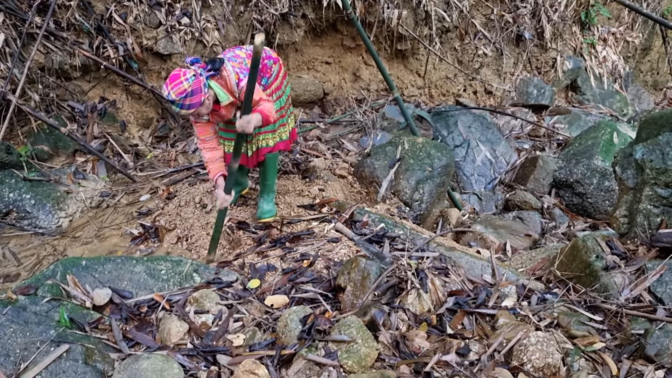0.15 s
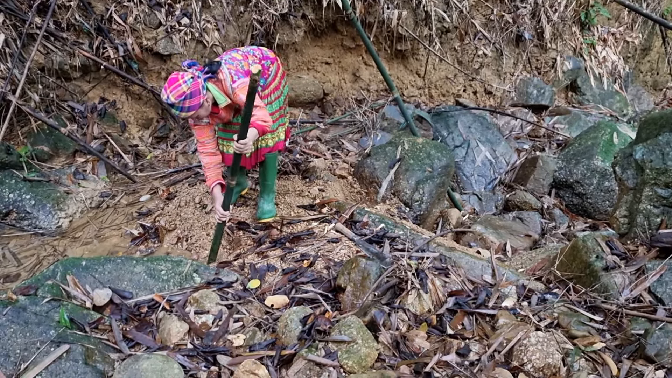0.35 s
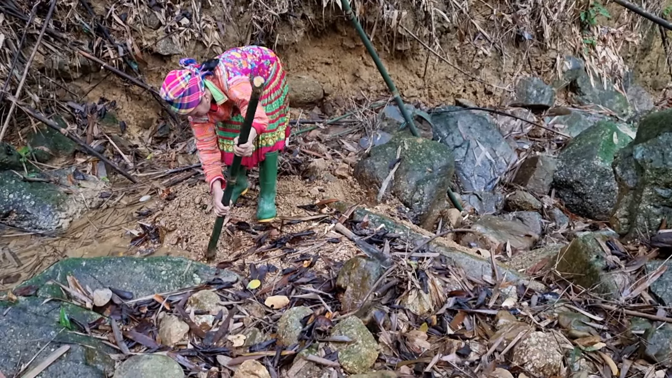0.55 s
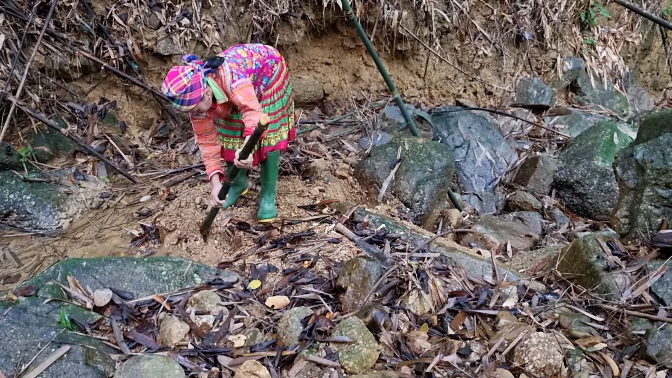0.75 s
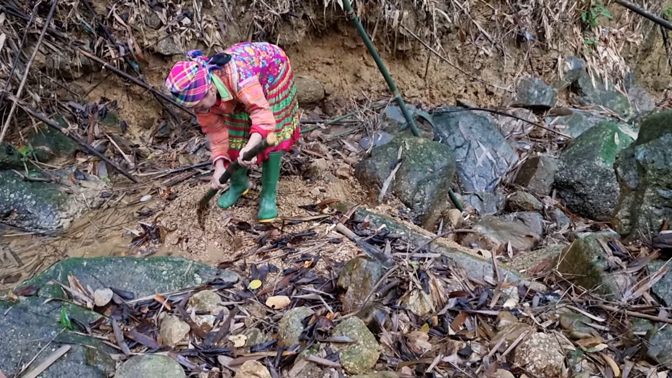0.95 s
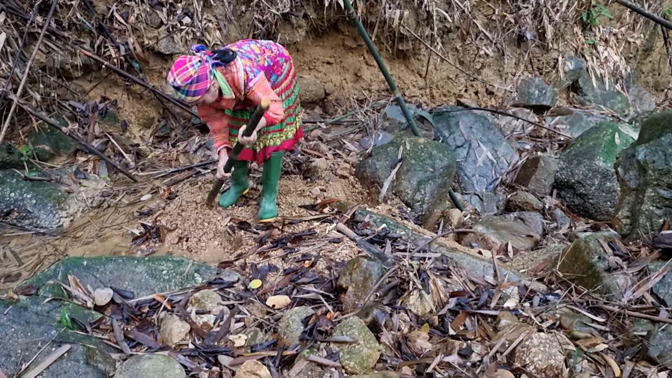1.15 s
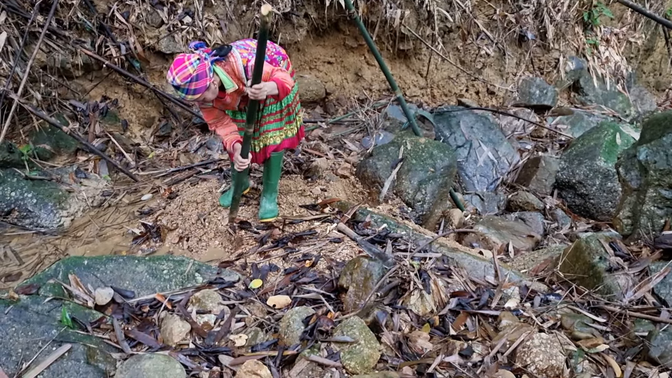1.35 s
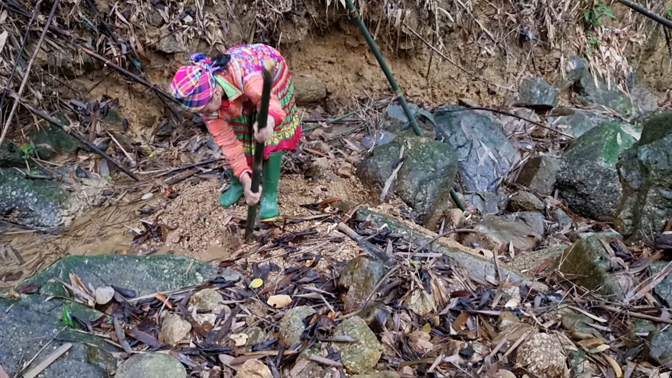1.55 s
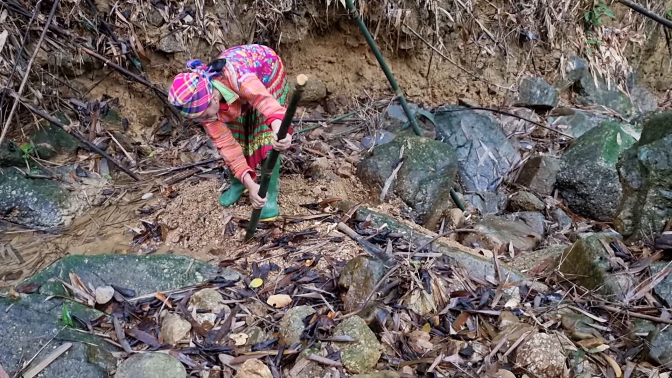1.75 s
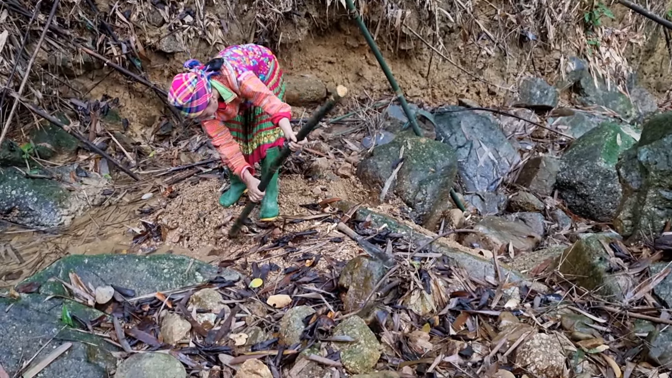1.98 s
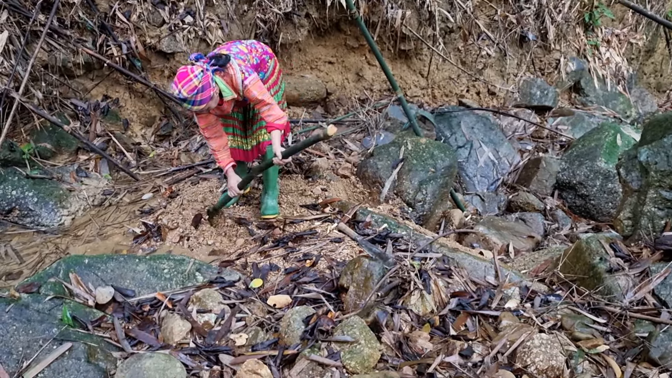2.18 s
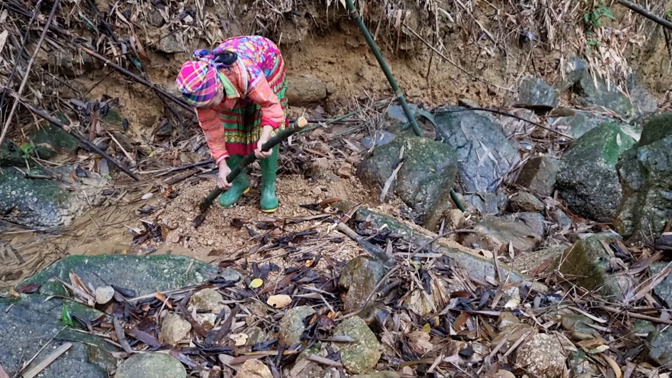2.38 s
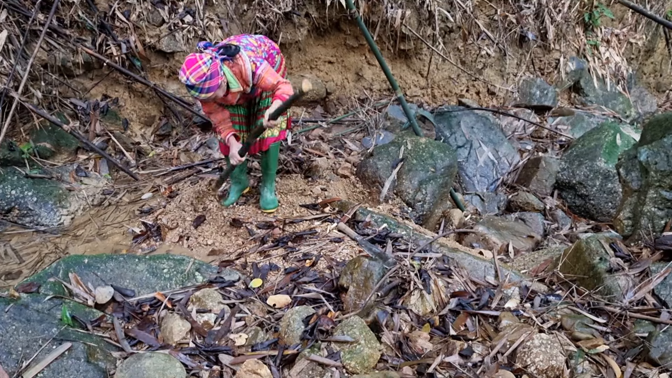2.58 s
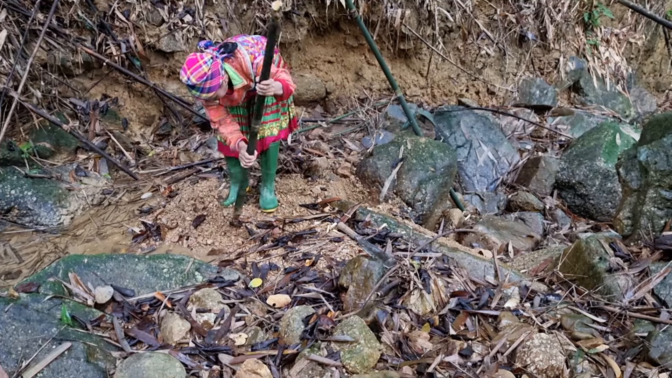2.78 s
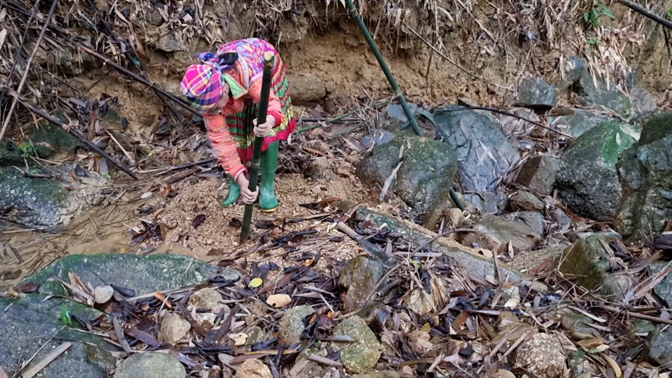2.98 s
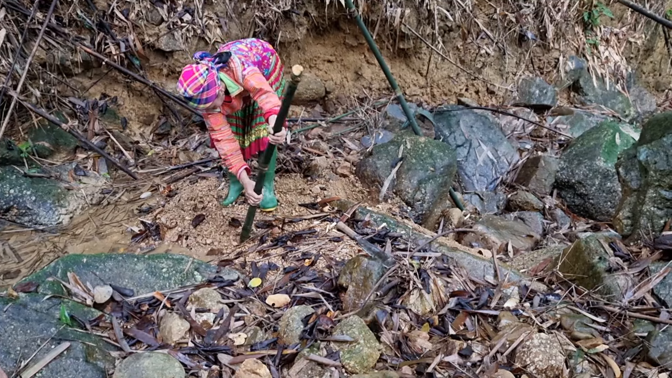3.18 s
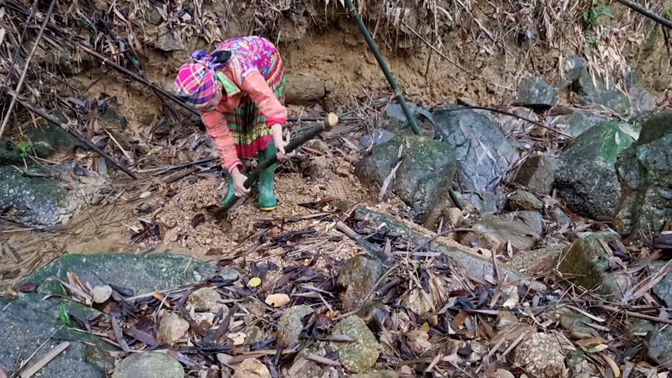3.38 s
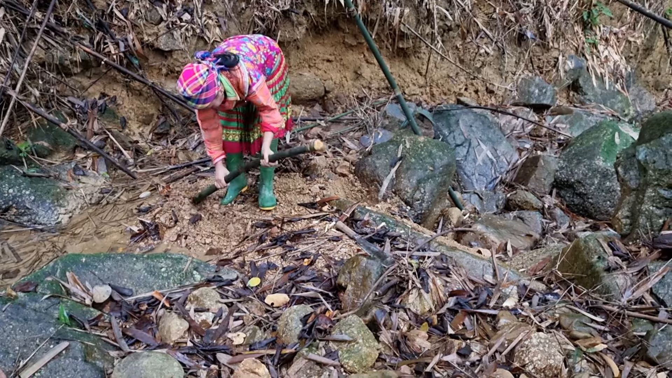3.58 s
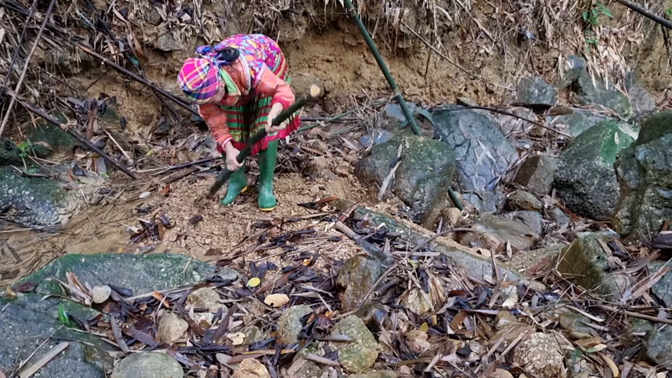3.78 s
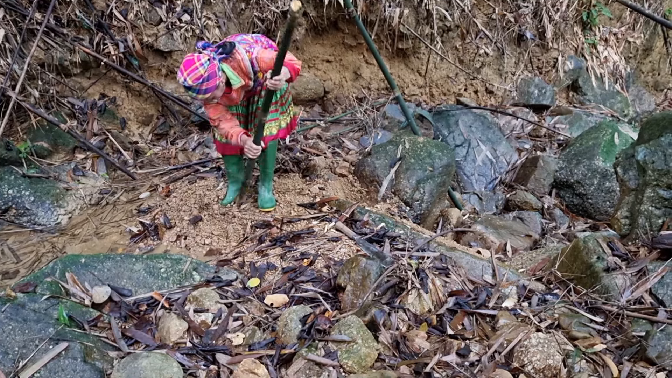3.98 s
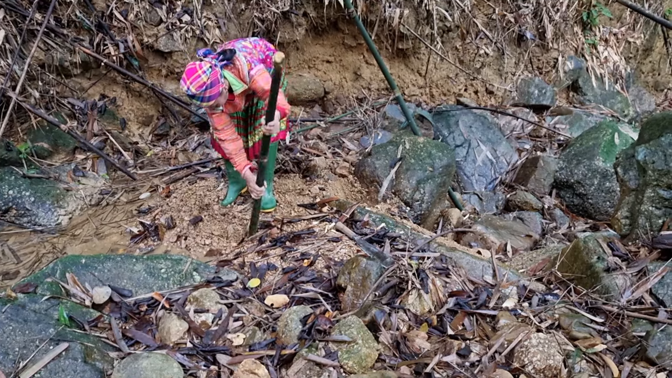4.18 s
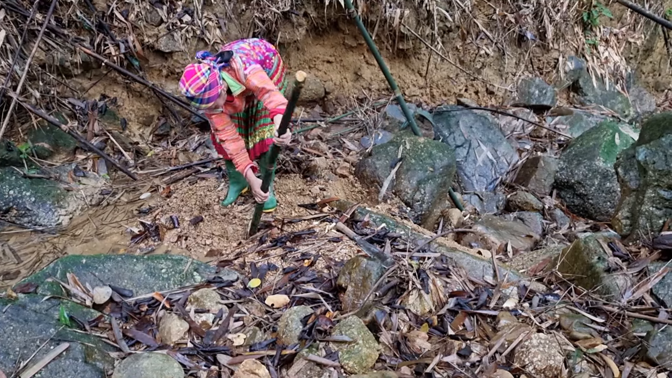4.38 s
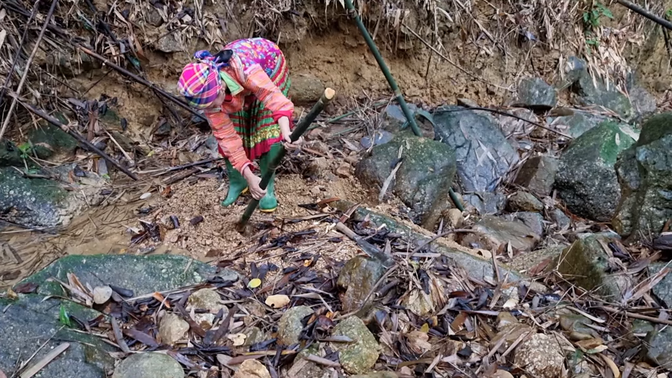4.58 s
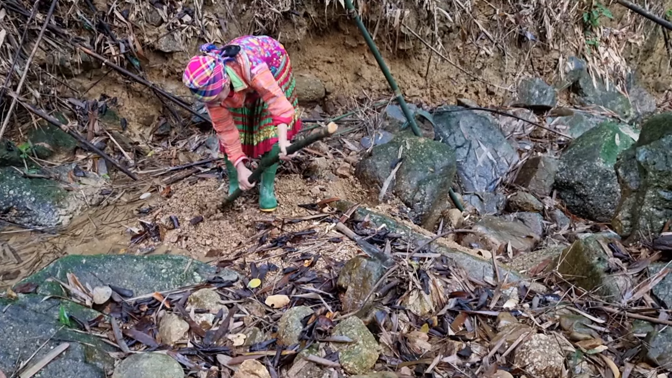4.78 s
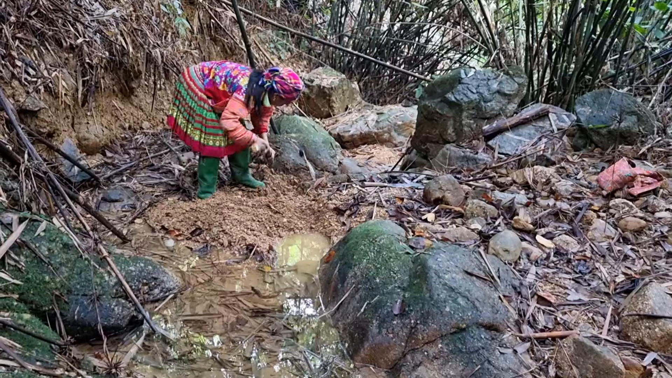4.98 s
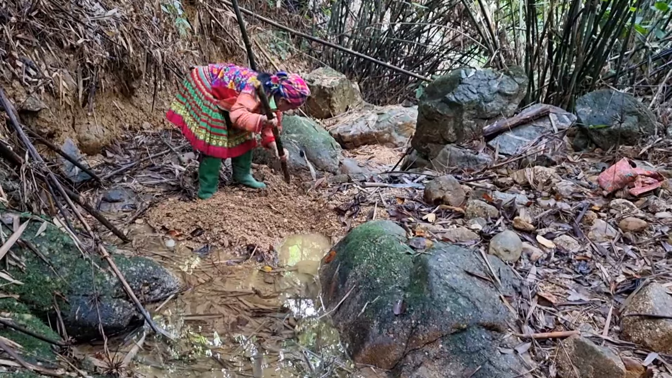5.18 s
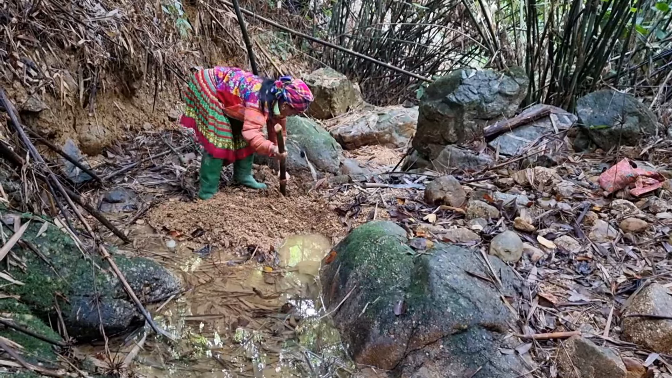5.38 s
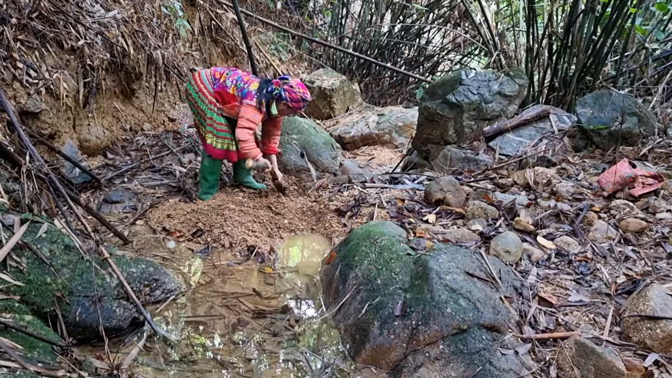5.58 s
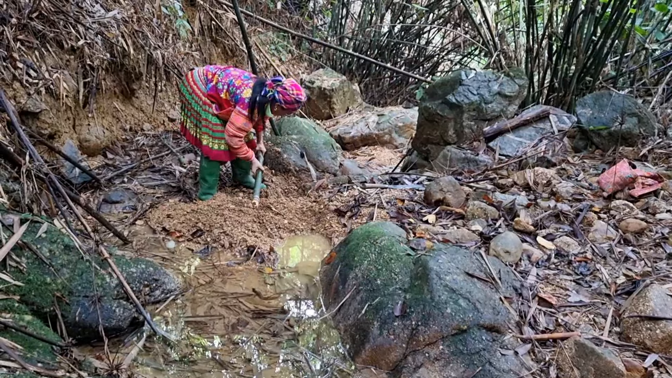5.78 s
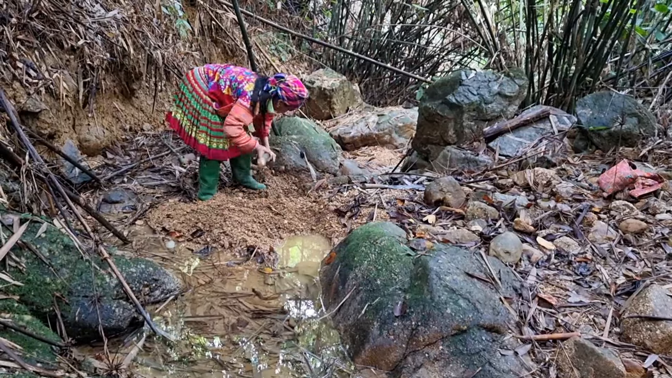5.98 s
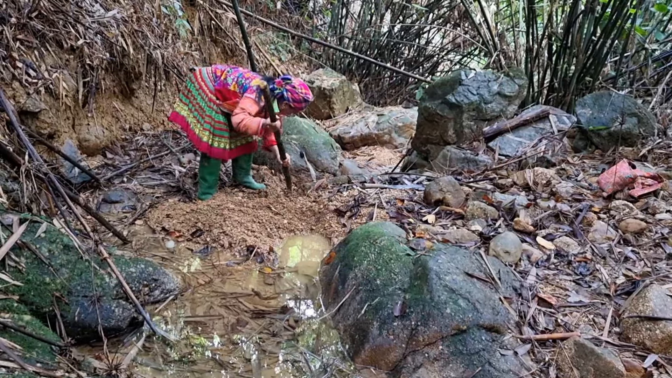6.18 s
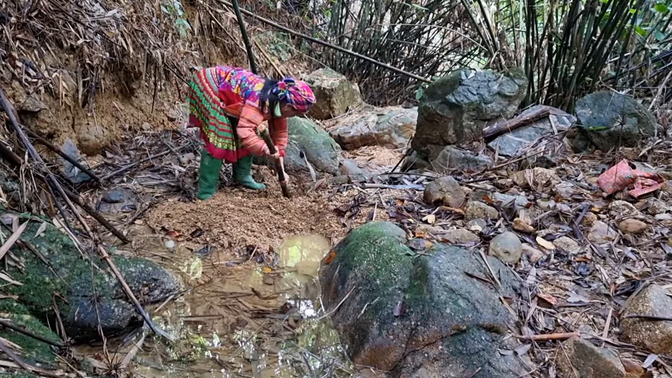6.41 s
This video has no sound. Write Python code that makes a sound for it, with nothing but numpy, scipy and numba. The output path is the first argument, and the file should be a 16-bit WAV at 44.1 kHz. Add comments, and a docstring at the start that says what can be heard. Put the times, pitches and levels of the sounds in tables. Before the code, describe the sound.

A small stream trickles with a soft, steady hiss outdoors while a digging pole works wet gravelly soil. The pole stabs in at about 0.2, 1.6, 3.0 and 4.2 seconds, each time with a short gritty crunch and a dull thud from the ground. After each strike it levers and scrapes through the gravel, around 0.5 to 1, 1.8 to 2.4, 3.2 to 3.6 and 4.4 to 4.9 seconds. Small stones click against the blade, clods knock softly and wet crumbs patter down, with a slight short echo off the rocks. At about 4.9 seconds everything drops to a momentary silence, then returns with the water closer, louder and splashier. Two quick stabs land at 5.4 and 5.6 seconds, followed by a scatter of wet crumbs around 5.9. A last strike at about 6.35 seconds comes with a scrape and sharp stone clicks.

```python
"""On the rocky bank of a small stream, a steel-shod digging pole is stabbed into wet gravelly soil
and levered to break it loose. Grit crunches as a mass of tiny impacts, the ground thuds, the blade
scrapes by stick-slip friction, stones ring and crumbs patter down, all scattered by the rocks.
The water hisses, splashes and rings with bubbles. After a short silence the work is heard from a
second place, closer to the stream."""
import sys
import numpy as np
from scipy import signal
from scipy.fft import rfft, irfft, next_fast_len
from scipy.io import wavfile
from scipy.ndimage import uniform_filter1d, map_coordinates
from numba import njit

SR = 44100
rng = np.random.default_rng(int(sys.argv[2]) if len(sys.argv) > 2 else 0)


def unload_audio(sound):
    """Save the sound as a 16-bit wav file, at the path given as the first command line argument."""
    columns = np.transpose(np.atleast_2d(sound))
    # keep every value between -1 and 1, then stretch to whole-number steps
    steps = np.round(np.clip(columns, -1, 1) * 32767)
    wavfile.write(sys.argv[1], SR, steps.astype(np.int16))


N = 284445
TIME = np.arange(N) / SR
FFT_SIZE = next_fast_len(N + SR // 2, True)
SILENCE_START_S, SILENCE_END_S = 4.89, 5.02


def from_db(db):
    """Amplitude ratio of a level in decibels."""
    return 10 ** (np.asarray(db) / 20)


def unit_power(x):
    """Normalisation to a mean square of one."""
    return x / np.sqrt(np.mean(x ** 2) + 1e-20)


def drift(turns_per_s):
    """Slow random modulation of unit power."""
    knots = rng.standard_normal(4000)
    return unit_power(np.interp(TIME * turns_per_s, np.arange(len(knots)), knots))


def frequency_response(spectrum):
    """Gain in each FFT bin, interpolated in decibels over log frequency."""
    hz, db = np.transpose(spectrum)
    bin_hz = np.fft.rfftfreq(FFT_SIZE, 1 / SR)
    return from_db(np.interp(np.log(bin_hz + 1), np.log(hz), db))


def coloured(x, spectrum):
    """Minimum-phase filter with the given spectral shape; white noise keeps its power."""
    cepstrum = irfft(np.log(unit_power(frequency_response(spectrum))), FFT_SIZE)
    cepstrum[1:FFT_SIZE // 2] *= 2
    cepstrum[FFT_SIZE // 2 + 1:] = 0
    return irfft(rfft(x, FFT_SIZE) * np.exp(rfft(cepstrum)), FFT_SIZE)[..., :N]


def grains(per_s, spread_db):
    """Shot noise: tiny contacts of random time, sign and size, at unit power."""
    sizes = from_db(spread_db * np.minimum(rng.exponential(1, N), 4.5))
    return unit_power(sizes * rng.choice([-1, 1], N) * (rng.random(N) < per_s / SR))


def bursts(per_s, spread_db, decay_s):
    """Envelope of random impacts whose energy decays exponentially."""
    energy = grains(per_s, spread_db) ** 2 + 1e-18
    return np.sqrt(signal.lfilter([1], [1, -np.exp(-1 / (decay_s * SR))], energy))


def contact(start, length, rise, t60):
    """Envelope of one contact: linear rise, hold and exponential decay, all in seconds."""
    age = TIME - start
    return np.clip(age / rise, 0, 1) * from_db(-60 * np.clip((age - length) / t60, 0, 3))


def resonator(x, hz, radius, numerator):
    """A damped oscillator driven by x; its amplitude shrinks by the factor `radius` each sample."""
    feedback = [1, -2 * radius * np.cos(2 * np.pi * hz / SR), radius * radius]
    return signal.lfilter(numerator, feedback, x + 1e-18)


def trickle(spectrum, bubbles_per_s, bubble_db, splash_db, flutter_db, ring_cycles=24):
    """Bubble resonance: trapped air rings briefly amid hiss and puffs of spray, in stereo."""
    bubbles = np.zeros((2, N))
    pitches = np.geomspace(900, 10000, num=22)
    for hz in pitches:
        radius = from_db(-60 * hz / (ring_cycles * SR))
        per_s = bubbles_per_s * np.sqrt(hz / 3000) / len(pitches)
        pops = grains(per_s, spread_db=2.2) * rng.uniform(-1, 1, (2, N))
        bubbles += np.sqrt(hz) * unit_power(resonator(pops, hz, radius, [0, 1]))
    splashes = bursts(per_s=90, spread_db=2, decay_s=0.005) * rng.standard_normal((2, N))
    hiss = rng.standard_normal((2, N))
    water = hiss + from_db(bubble_db) * unit_power(bubbles) + from_db(splash_db) * unit_power(splashes)
    # long waves reach both sides alike
    water += signal.sosfilt(signal.butter(1, 450, fs=SR, output="sos"), water.mean(axis=0) - water)
    return unit_power(coloured(water, spectrum)) * from_db(flutter_db * drift(45))


# Spectra of the water from afar and close by: frequency_hz, relative_db
FAR_WATER_SPECTRUM = [(20, -37.5), (65, -13.5), (150, -20.5), (420, -16.5), (555, -5.5), (700, -9),
                      (1100, -12), (1600, -2.5), (2000, 0.5), (2800, -3.5), (4200, -4), (6000, -6),
                      (7900, -3.5), (9000, -10), (15500, -10)]
NEAR_WATER_SPECTRUM = [(20, -44), (65, -19), (200, -14.5), (300, -12.5), (500, -8), (700, -2.5), (1100, -1),
                       (1800, 2.5), (2600, 1.5), (4200, 0.5), (7900, 0), (9500, -5.5), (15500, -3.5)]


def stream(far_db=-44.0, near_db=-35.5):
    """A steady source is louder at short range: the water is first some way off, then close by."""
    far = trickle(FAR_WATER_SPECTRUM, bubbles_per_s=700, bubble_db=-9, splash_db=-9.5, flutter_db=1.5)
    near = trickle(NEAR_WATER_SPECTRUM, bubbles_per_s=500, bubble_db=-7, splash_db=1.5, flutter_db=0.77)
    return np.where(TIME < SILENCE_END_S, from_db(far_db) * far, from_db(near_db) * near)


# Spectra of a wet crumb's bright smack and dull body: frequency_hz, relative_db
SMACK_SPECTRUM = [(1000, -37), (2500, 0.5), (4500, 5.5), (6200, 0.5), (7900, 0), (9200, -10),
                  (15500, -13.5)]
BODY_SPECTRUM = [(300, -19), (900, -16.5), (1900, 0.5), (3100, 2.5), (4600, -4.5), (8000, -33)]


def small_crumbs(per_s=70, far_db=-57, near_db=-47, body_db=-6):
    """Inelastic impacts: wet crumbs drop at random, each a brief burst of noise."""
    smacks = bursts(per_s, spread_db=1.2, decay_s=0.004) * rng.standard_normal(N)
    patter = from_db(np.where(TIME < SILENCE_END_S, far_db, near_db)) * unit_power(smacks)
    return coloured(patter, SMACK_SPECTRUM) + coloured(from_db(body_db) * patter, BODY_SPECTRUM)


# Spectra of crushed gravel, sharp grit and sand: frequency_hz, relative_db
GRAVEL_SPECTRUM = [(200, -15.5), (450, -20.5), (720, -0.5), (950, -7), (1300, -3), (1600, 1), (2100, 3),
                   (2800, 3), (4500, -12.5), (9000, -30.5)]
GRIT_SPECTRUM = [(800, -14.5), (1700, -4), (2600, -3), (3500, 0), (4800, -1), (6200, -9), (7900, -9.5),
                 (9000, -13), (15500, -17.5)]
SAND_SPECTRUM = [(1200, -16), (2500, 3), (4200, -1.5), (6200, -3), (8000, -2), (9000, -9), (15500, -12)]
# Blows that bite, stick and bite again, with relative levels: start_s, length_s, gravel_db, grit_db,
# second_delay_s, second_gravel_db, second_grit_db, bounce_db, bounce_hz, shake_db
BLOWS = [(0.217, 0.014, -39.5, -29, 0.022, -31.5, -28, -46.5, 134.7, -47.5),
         (1.568, 0.03, -23, -24, 0.035, -27.5, -34.5, -42.5, 118, -42.5),
         (2.95, 0.01, -22, -23.5, 0.019, -26.5, -24.5, -38, 124, -37.5),
         (4.213, 0.018, -23, -22.5, 0.025, -31.5, -31.5, -45.5, 109, -49.5),
         (5.372, 0.012, -25, -28.5, 0.029, -27.5, -28, -44.5, 124, -40),
         (5.647, 0.0076, -30.5, -32.5, 0.013, -29, -43, -55, 189.8, -47.5),
         (6.352, 0.022, -26, -37, 0.035, -27.5, -29.5, -44, 173.4, -52)]


def stabs(rise_s=0.0064, gravel_gain_db=-5.0, grit_gain_db=-2.4, spray_gain_db=-13):
    """Granular crushing: the blade bites twice and sprays sand; incoherent bites add in power."""
    bites = [row[:4] for row in BLOWS]
    for start, length, _, _, delay, gravel_db, grit_db, *_ in BLOWS:
        bites.append((start + delay, length, gravel_db, grit_db))
    gravel, grit, spray = np.zeros((3, N))
    for start, length, gravel_db, grit_db in bites:
        gravel += (from_db(gravel_db + gravel_gain_db) * contact(start, length, rise_s, t60=0.13)) ** 2
        grit += (from_db(grit_db + grit_gain_db) * contact(start, length, rise_s, t60=0.16)) ** 2
        settling = contact(start - length / 2, length, rise=length, t60=0.28)
        spray += (from_db(grit_db + spray_gain_db) * settling) ** 2
    crunch = pole(coloured(np.sqrt(gravel) * grains(per_s=5000, spread_db=4), GRAVEL_SPECTRUM))
    crunch += coloured(np.sqrt(grit) * grains(per_s=5900, spread_db=-3), GRIT_SPECTRUM)
    return crunch + coloured(np.sqrt(spray) * grains(per_s=5000, spread_db=3), SAND_SPECTRUM)


# Modes of the pole and its blade: pitch_hz, bandwidth_hz, gain_db
POLE_MODES = [(748, 156, -7), (1310, 130, 7), (1550, 160, -1.5), (1940, 430, -7), (3280, 400, -20),
              (4740, 240, -22)]


def pole(x):
    """Modal resonance: contacts are heard directly and through the damped modes of the pole."""
    out = x.copy()
    for hz, bandwidth_hz, db in POLE_MODES:
        radius = np.exp(-np.pi * bandwidth_hz / SR)
        band_pass = (1 - radius * radius) / 2 * np.array([1, 0, -1])
        out += from_db(db) * resonator(x, hz, radius, band_pass)
    return out


# Spectrum of the shaking ground: frequency_hz, relative_db
GROUND_SPECTRUM = [(20, -32), (38, -19), (56, -3), (90, -12.5), (122, -9), (160, -16), (210, -3.5),
                   (290, -17), (450, -17), (900, -33.5)]
# Clods breaking loose or dropping: start_s, length_s, knock_db, pitch_hz, shake_db
CLOD_KNOCKS = [(0.613, 0.012, -50, 480, -64), (2.27, 0.028, -57, 208, -57), (2.318, 0.015, -41.5, 410, -54),
               (2.773, 0.055, -65, 230, -58), (3.375, .022, -62.5, 139, -54),
               (3.554, 0.023, -58, 204.6, -54), (6.368, 0.046, -41, 338, -60)]


def thuds(lag_s=0.012, overhang_s=0.0073, pitch_wobble=0.0929):
    """Damped vibration: soft ground bounces at a low note and shakes under each blow or clod."""
    shake = coloured(grains(per_s=2000, spread_db=3), GROUND_SPECTRUM)
    shake /= np.sqrt(uniform_filter1d(shake ** 2, size=1500) + 1e-9)  # even out its level
    phase_per_hz = 2 * np.pi * np.cumsum(1 + pitch_wobble * drift(60)) / SR
    out = np.zeros(N)
    for bite_start, length, _, _, delay, _, _, bounce_db, hz, shake_db in BLOWS:
        # the ground is driven from just after the first bite until just after the second
        start = bite_start + lag_s
        hold = delay + length + overhang_s - lag_s
        bounce = np.sin(hz * phase_per_hz)
        out += from_db(bounce_db) * contact(start, hold, rise=0.0099, t60=0.14) * bounce
        out += from_db(shake_db) * contact(start, hold, rise=0.022, t60=0.19) * shake
    for start, length, knock_db, hz, shake_db in CLOD_KNOCKS:
        knock = from_db(knock_db) * np.sin(hz * phase_per_hz) + from_db(shake_db) * shake
        out += contact(start, length, rise=0.006, t60=0.12) * knock
    return out


@njit
def moving_resonance(x, hz, damping):
    """State-variable band-pass whose centre follows hz; damping is 1/Q."""
    out, low, band = np.zeros(len(x)), 0., 0.
    for i in range(len(x)):
        step = 2 * np.sin(np.pi * hz[i] / SR)
        low += step * band
        band += step * (x[i] - low - damping * band)
        out[i] = band / np.sqrt(step)
    return out


# Spectra of the scraping blade and the rumbling soil: frequency_hz, relative_db
SCRAPE_SPECTRUM = [(200, -22), (430, -11), (650, 4), (950, 0.5), (1300, -4), (2150, 3), (2600, -4),
                   (5000, 4.5), (10000, -27)]
RUMBLE_SPECTRUM = [(20, -20), (55, -5), (120, -1), (220, 1), (400, -1), (600, 3.5), (1200, -41.5)]
# Levering pushes, with relative levels: start_s, rise_s, length_s, scrape_db, sag_db_per_s, sand_db,
# rumble_db, give_delay_s, centre_before_hz, centre_after_hz, hole_ring_db
PUSHES = [(0.455, 0.032, 0.029, -38.5, -9, -46.5, -69, .05, 1700, 1610, 1),
          (0.58, 0.048, .29, -36, 39.5, -44.5, -59, 0.12, 1540, 820, 0),
          (0.905, .04, 0.036, -45.5, 6, -52.5, -72, .04, 780, 960, -6),
          (1.807, 0.017, 0.022, -38, 16, -61, -63.5, .04, 1560, 1560, -0.5),
          (1.885, 0.026, 0.053, -43.5, 4, -47, -62.5, .04, 1580, 1550, -20),
          (1.93, .147, .4, -33.5, 30.5, -42, -50, 0.41, 1560, 480, -20),
          (3.23, 0.11, 0.31, -34.5, 12.5, -42, -52, 0.4, 1430, 1220, -13.5),
          (4.44, 0.053, 0.092, -41, 17.5, -49.5, -75, .08, 1230, 1120, -7.5),
          (4.54, 0.034, 0.12, -41.5, 22, -50.5, -67, 0.073, 1200, 1330, -9),
          (4.68, 0.082, 0.26, -41.5, 3, -52, -56.5, 0.24, 1340, 1004, -12),
          (6.305, 0.03, 0.13, -35.5, 11, -39, -60, 0.096, 1680, 1500, -19)]


def levering(slip_depth_db=2.4, slips_per_s=70, release_t60=0.32, give_s=0.13, crack_s=0.013):
    """Stick-slip friction: the blade drags through gravel; yielding soil rumbles and bends the pitch."""
    scrape, hollow, sand, rumble = np.zeros((4, N))
    centre_hz = np.full(N, float(PUSHES[0][8]))
    for start, rise, length, db, sag, sand_db, rumble_db, delay, before_hz, after_hz, hole_db in PUSHES:
        age = TIME - start
        effort = contact(start, length, rise, release_t60) * (age < length + release_t60)
        sag_db = -sag * np.clip(age - rise, 0, length)
        crack_db = np.exp(-((age - rise) / crack_s) ** 2)  # packed gravel cracks at full force
        level = effort * from_db(db + sag_db + crack_db) / np.hypot(1, from_db(hole_db))
        scrape += level
        hollow += level * from_db(hole_db)
        settling = from_db(-7) * contact(start, length, rise=length, t60=1.6)  # loose sand trickles on
        sand += np.hypot(effort, settling) * from_db(sand_db + 0.89 * sag_db + crack_db / 2)
        giving = (age - delay) / give_s  # passes zero as the soil gives way
        rumble += effort * from_db(rumble_db + 0.14 * sag_db + 5 * np.exp(-giving ** 2))
        glide_hz = before_hz + (after_hz - before_hz) * (1 + np.tanh(giving)) / 2
        centre_hz = np.where(TIME < start, centre_hz, glide_hz)
    slip_db = slip_depth_db * drift(slips_per_s)
    friction = pole(coloured(grains(per_s=1800, spread_db=1.5), SCRAPE_SPECTRUM))
    rasp = unit_power(moving_resonance(friction, centre_hz, damping=0.97))
    hole_ring = moving_resonance(grains(per_s=1500, spread_db=2), centre_hz, damping=0.36)
    hole_ring = unit_power(moving_resonance(hole_ring, centre_hz, damping=0.36))
    scraping = from_db(slip_db) * (scrape * rasp + hollow * hole_ring) + scrape * pebbles()
    hiss = sand * from_db(3 + slip_db / 2) * grains(per_s=7000, spread_db=5)
    soil = rumble * from_db(slip_db - 2) * grains(per_s=810, spread_db=-2)
    return scraping + coloured(hiss, SAND_SPECTRUM) + coloured(soil, RUMBLE_SPECTRUM)


def pebbles(relative_db=-8, per_s=80, t60=0.033, low_hz=1100, high_hz=2600, count=9):
    """Impulse excitation: pebbles knock at random, each ringing at its own natural frequency."""
    radius = from_db(-60 / (t60 * SR))
    rings = np.zeros(N)
    for hz in np.geomspace(low_hz, high_hz, count):
        knocks = grains(per_s / count, spread_db=1.5)
        rings += resonator(knocks, hz, radius, [0, np.sin(2 * np.pi * hz / SR)])
    return from_db(relative_db) * unit_power(rings)


# Larger stones knocking against the blade: time_s, relative_db, pitch_hz
STONE_KNOCKS = [(0.623, -19, 1740), (0.63, -16, 1950), (1.832, -23.5, 1270), (2.072, -17, 1410),
                (2.133, -21, 1210), (2.201, -19.5, 1290), (3.278, -20.5, 2250), (3.368, -16.5, 1210),
                (3.469, -20, 1280), (4.592, -28, 2570), (4.844, -26.5, 696), (5.664, -14, 1606),
                (6.371, -9, 1970), (6.41, -9, 3055), (6.424, -8, 1970)]


def stones(gain_db=-8, rasp_gain=0.37, rise_s=0.0019):
    """Damped free vibration: a caught stone rings briefly in the soil and rasps as it slips free."""
    ring, slip = np.zeros((2, N))
    for time, db, hz in STONE_KNOCKS:
        tone = np.sin(2 * np.pi * hz * (TIME - time))
        ring += from_db(db) * contact(time - rise_s, 2 * rise_s, rise_s, t60=0.016) * tone
        slip += from_db(db) * contact(time - rise_s, 2 * rise_s, rise_s, t60=0.011)
    rasp = coloured(slip * grains(per_s=8000, spread_db=1.5), GRAVEL_SPECTRUM)
    return from_db(gain_db) * (ring + rasp_gain * rasp)


# Larger crumbs and drops landing: start_s, relative_db, body_over_smack_db
LANDINGS = [(0.676, -25.5, -1), (1.1703, -35, -9.5), (1.2706, -30.5, -10), (1.452, -28, -20),
            (1.7735, -29, 1.5), (2.484, -23.5, -7), (2.75, -21, -7), (2.9085, -32, -3.5),
            (3.8621, -25, -2.5), (5.0607, -24.5, -2), (5.2142, -26, 2), (5.2555, -33, -17),
            (5.6045, -33, 6.5), (5.8482, -23, -3), (5.8808, -22.5, -6), (5.893, -20.5, -7),
            (5.9123, -24, 3), (6.0087, -23.5, 1.5), (6.06, -28, -20), (6.1305, -20, -19)]


def large_crumbs(gain_db=-5, tail_db=-18):
    """Inelastic impacts: each wet crumb lands with a brief smack, a dull body and a weaker patter."""
    patter = grains(per_s=15000, spread_db=1.2)
    smacks, body = np.zeros((2, N))
    for start, db, body_db in LANDINGS:
        impact = contact(start, length=0.0035, rise=0.0012, t60=0.016)
        tail = from_db(tail_db) * contact(start, length=0.0018, rise=0.003, t60=0.037)
        hit = from_db(db + gain_db) * (impact + tail) * patter
        smacks += hit
        body += from_db(body_db) * hit
    return coloured(smacks, SMACK_SPECTRUM) + coloured(body, BODY_SPECTRUM)


# Where the blade works: start_s, right_lag_samples, left_over_right_db
BLADE_POSITIONS = [(0, 3.5, 0.3), (4.95, 5.85, 0.3), (6.3, 5.1, -3)]
# Sound scattered by the rocks: frequency_hz, gain_db
SCATTER_SPECTRUM = [(60, -7), (200, -14.5), (600, -6), (1400, -7.5), (4000, -2), (15000, 3.5)]


def bank(x, direct_db=-0.79, paths=3, bank_t60=0.096, gully_t60=0.65, gully_db=-16.5):
    """Diffuse scattering: direct sound reaches the left first; rocks echo it along changing paths."""
    positions = np.array(BLADE_POSITIONS)
    _, lag, balance_db = positions[np.searchsorted(positions[1:, 0], TIME)].T
    direct = np.array([x, map_coordinates(x, [np.arange(N) - lag], order=3)])
    age = TIME[:SR // 2]
    decay = np.hypot(from_db(-60 * age / bank_t60), from_db(gully_db - 60 * age / gully_t60))
    weights = np.array([drift(35) for _ in range(paths)])
    weights /= np.sqrt(np.sum(weights ** 2, axis=0))  # the paths share a constant power
    echo_spectrum = 0
    for weight in weights:
        echoes = rng.standard_normal((2, len(age))) * decay
        echoes /= np.sqrt(np.sum(echoes ** 2, axis=1, keepdims=True))
        echo_spectrum += rfft(x * weight, FFT_SIZE) * rfft(echoes, FFT_SIZE)
    scattered = irfft(frequency_response(SCATTER_SPECTRUM) * echo_spectrum, FFT_SIZE)[:, :N]
    balance = from_db(np.array([balance_db, -balance_db]) / 2)
    return balance * (from_db(direct_db) * direct + scattered)


def scene():
    """Superposition: the digging, scattered by the bank, adds to the stream behind it."""
    digging = stabs() + thuds() + levering() + stones() + large_crumbs() + small_crumbs()
    return bank(digging) + stream()


def record(dry, fade_out_s=0.043, fade_in_s=0.071, low_cut_hz=42, high_cut_hz=15650):
    """Band limiting trims the deepest bass and the top; the level fades to a short silence and back."""
    fade_out = np.clip((SILENCE_START_S - TIME) / fade_out_s, 0, 1)
    fade_in = np.clip((TIME - SILENCE_END_S) / fade_in_s, 0, 1) ** 1.1
    high_pass = signal.butter(3, low_cut_hz, "high", fs=SR, output="sos")
    low_pass = signal.ellip(12, 0.1, 80, high_cut_hz, fs=SR, output="sos")
    return signal.sosfilt(low_pass, signal.sosfilt(high_pass, dry) * (fade_out + fade_in))


dry = scene()
out = record(dry)
unload_audio(out)
```